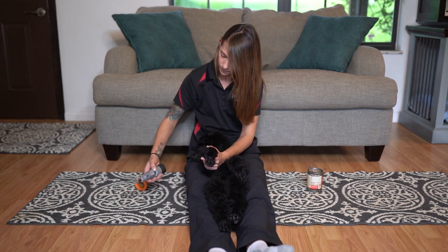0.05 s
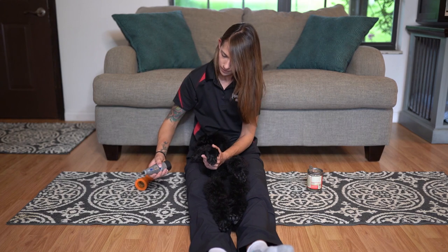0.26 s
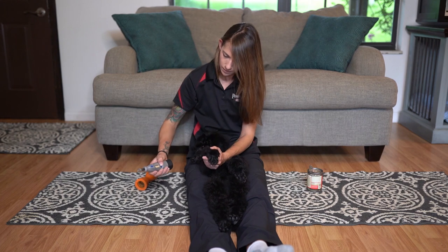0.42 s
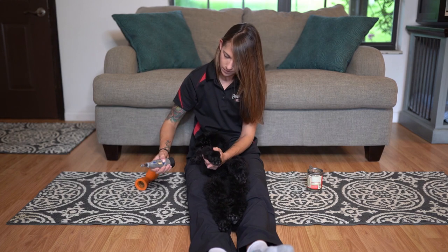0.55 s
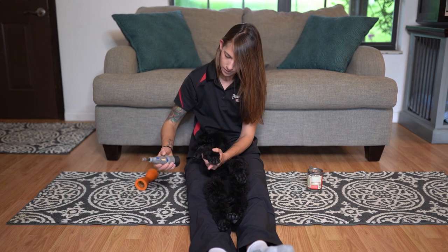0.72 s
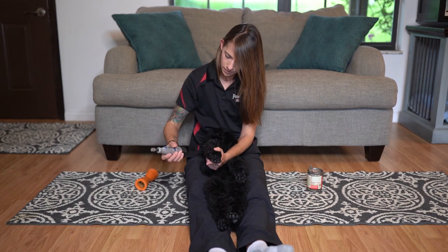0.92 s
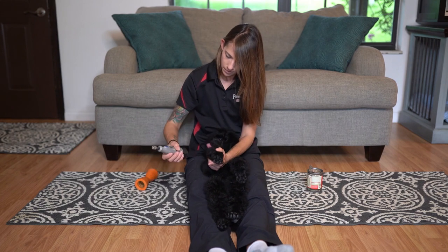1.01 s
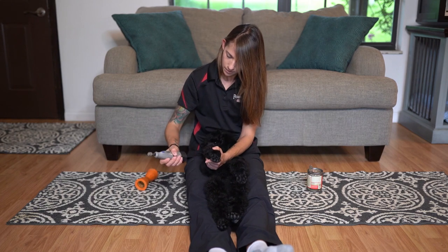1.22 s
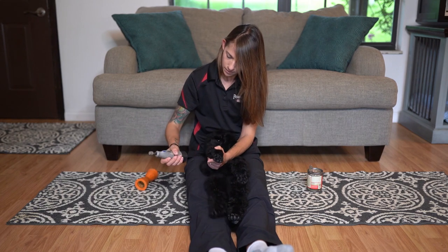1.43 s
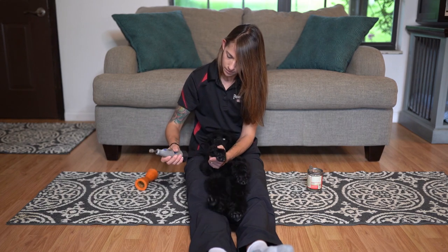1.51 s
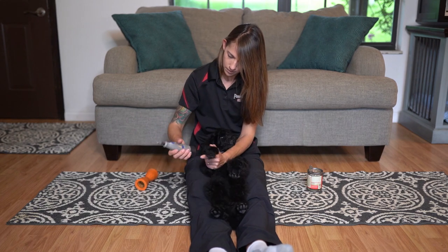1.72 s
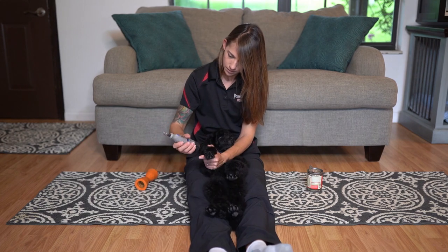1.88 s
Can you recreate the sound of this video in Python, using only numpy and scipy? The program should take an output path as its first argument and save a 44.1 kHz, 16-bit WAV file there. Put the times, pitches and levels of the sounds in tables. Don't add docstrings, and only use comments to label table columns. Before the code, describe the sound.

Handheld cordless grinder buzzes in two short whining bursts indoors, preceded by clicks and a hard snap

```python
import sys
import numpy as np
from scipy import signal
from scipy.fft import rfft, irfft
from scipy.io import wavfile
from scipy.ndimage import uniform_filter1d, map_coordinates

SR = 44100
rng = np.random.default_rng(int(sys.argv[2]) if len(sys.argv) > 2 else 0)


def voltage_ratio(level):
    return 10 ** (np.asarray(level, float) / 20)


def inscribe(sig):
    pcm = np.round(np.clip(np.atleast_2d(sig).T, -1, 1) * 32767)
    wavfile.write(sys.argv[1], SR, pcm.astype(np.int16))


N = 85995
OFF_DB = -100


def level(x, db):
    return x * voltage_ratio(db) / np.sqrt(np.mean(x ** 2))


def unit(x):
    return x / np.abs(x).max()


def band(x, hz, width, order=1):
    edges = [max(hz - width / 2, 20), min(hz + width / 2, .48 * SR)]
    return signal.sosfilt(signal.butter(order, edges, "band", fs=SR, output="sos"), x)


def colour(x, table):
    hz = np.arange(N // 2 + 1) * SR / N + 1
    points = np.array(table)
    gain_db = np.interp(np.log(hz), np.log(points[:, 0]), points[:, 1])
    return irfft(rfft(x) * voltage_ratio(gain_db), N)


def walk(rate):
    hold = int(SR / rate)
    steps = np.repeat(rng.standard_normal(N // hold + 1), hold)
    return 1.3 * uniform_filter1d(uniform_filter1d(steps, hold), hold)[:N]


def spiky_noise(spread_db):
    return rng.standard_normal(N) * voltage_ratio(spread_db * rng.exponential(size=N))


def curve(tables, col, off):
    t = np.arange(N) / SR
    out = np.full(N, float(off))
    for rows in map(np.array, tables):
        inside = (t >= rows[0, 0]) & (t <= rows[-1, 0])
        out[inside] = np.interp(t, rows[:, 0], rows[:, col])[inside]
    return uniform_filter1d(out, 300)


# time in seconds, pitch in Hz, level in dB.
WHINE = [
    [(.47, 1130, -53), (.5, 1194, -56), (.53, 1268, -39), (.553, 1291, -53.5), (.565, 1296, -56),
     (.582, 1303, -45.5), (.615, 1263, -55), (.64, 1094, -64.5), (.67, 982, -61)],
    [(1.235, 930, -80), (1.265, 1040, -58), (1.31, 1269, -52.5), (1.39, 1435, -42), (1.435, 1480, -53),
     (1.457, 1472, -60), (1.485, 1450, -41.5), (1.53, 1323, -45.5), (1.575, 1078, -59)],
]
# order in cycles per turn, level in dB relative to the whine.
ORDERS_DB = [(9, -23), (11, -18.5), (12, -24), (17, -17.5)]
# time in seconds, fan hiss level in dB, shell rattle and grip drone in dB over the hiss.
RUN = [
    [(.44, -41, -2.5, -12), (.47, -50.5, 1, 1), (.53, -49.5, -7, -5), (.62, -52.5, -1.5, -17),
     (.675, -51.5, 6.5, -1), (.79, -58, -0.5, -10.5), (.835, -62, -4, -15), (.87, -74, -11, 6),
     (.92, -88, -2, 0)],
    [(1.21, -77, 9, 3), (1.25, -53, -5.5, -1), (1.31, -47, -1.5, -1), (1.46, -48, 1, -20),
     (1.5, -45, 3, -8), (1.58, -47, 3, 1.5), (1.65, -52, -1.5, 1), (1.78, -62.5, -1, -7),
     (1.93, -79, 7.5, -3)],
]
# centre in Hz, width in Hz, level in dB.
SHELL = [(1750, 460, 8.5), (2125, 700, 10), (2500, 230, -2.5), (2850, 480, -10.5)]
# centre in Hz, width in Hz, level in dB.
GRIP = [(1080, 310, -16.5), (1200, 170, -3.5), (1396, 370, 7), (1605, 130, -0.5)]
# frequency in Hz, density in dB per Hz.
FAN = [(1880, -19), (3200, -5), (3770, -4), (4270, -0.5), (7440, -1), (11500, -3), (15800, -12.5),
       (16200, -42), (16500, -48)]


def motor():
    whine_order = 10
    rows = np.vstack(WHINE)
    hz = np.interp(np.arange(N) / SR, rows[:, 0], rows[:, 1]) * (1 + .006 * walk(60.02))
    turn = np.cumsum(hz / whine_order) / SR

    def tone(order):
        return np.sqrt(2) * np.sin(2 * np.pi * (order * turn + rng.random()))

    whine = voltage_ratio(0.5 * walk(36)) * tone(whine_order)
    for order, db in ORDERS_DB:
        whine = whine + voltage_ratio(db + 9.27 * walk(70)) * tone(round(order))

    gate = 0.5 + .8 * np.exp(-(turn % 1) / 0.51)
    grit = spiky_noise(2.73) * gate
    shell = sum(voltage_ratio(db) * band(grit, f, w) for f, w, db in SHELL)
    shell = level(shell, 0.4) * voltage_ratio(1.2 * walk(29.3))
    grip = sum(voltage_ratio(db) * band(grit, f, w, order=2) for f, w, db in GRIP)
    grip = level(grip, 0) * voltage_ratio(2.5 * walk(39.5))

    fan = level(colour(spiky_noise(1.9) * gate, [(1500, -49)] + FAN), 0)
    fan = fan + .5 * band(fan, 11740, 610) + .5 * band(fan, 4290, 270) + 0.22 * band(fan, 6300, 400)

    whine_gain = voltage_ratio(curve(WHINE, 2, OFF_DB) - 2.0)
    run_gain = voltage_ratio(curve(RUN, 1, OFF_DB) - 3.5)
    body = fan + voltage_ratio(curve(RUN, 2, 0)) * shell + voltage_ratio(curve(RUN, 3, 0)) * grip
    return whine_gain * whine + run_gain * body


# start in seconds, peak in dB, ring in Hz, dull share from 0 to 1.
CLICKS = [(0.1368, -40.5, 2630, 0.26), (0.159, -60, 9800, .1), (0.1721, -39.5, 3140, 0.56),
          (0.2293, -45.5, 5560, 0), (0.2422, -25, 6820, 0.23), (0.279, -52, 7100, 0.6),
          (0.284, -52, 8260, 0), (0.3046, -64, 8650, 0.3), (0.3393, -45, 1920, 0.76),
          (0.3807, -40.5, 2040, 0.34), (0.4044, -40.5, 1750, 0.86), (0.426, -22.5, 8430, 0.72),
          (0.4454, -41, 7900, 0.9), (0.4678, -33, 7660, 0.35), (0.472, -46, 4670, .1)]


def clicks():
    length = 900
    out, t = np.zeros(N), np.arange(length) / SR

    def ring(hz, fade_s):
        return np.sin(2 * np.pi * hz * t) * np.clip(t / 0.00038, 0, 1) * np.exp(-t / fade_s)

    for s, db, hz, dull in CLICKS:
        push = rng.standard_normal(length) * t * np.exp(-t / .0007)
        dull = np.clip(dull, 0, 1)
        crack = unit(band(push, 7970, 6530, order=2))
        crack = crack + .45 * unit(band(push, 4130, 1860, order=2)) + .4 * unit(band(push, 13400, 5100))
        knock = ring(2254, 0.00083) + 0.29 * ring(1752, 0.0025) + .16 * ring(1181, 0.003)
        click = (1 - dull) * crack + 0.71 * ring(hz, .0007) + dull * knock
        i = int(s * SR)
        out[i:i + length] += voltage_ratio(db) * unit(click)
    return out


def snap():
    t = np.clip(np.arange(N) / SR - .4326, 0, 1)
    push = rng.standard_normal(N) * t * np.exp(-t / 0.00075)
    return voltage_ratio(-22) * unit(band(push, 9500, 9400, order=2))


# centre in seconds, length in seconds, level in dB.
RUSTLE = [
    (0.194, 0.036, -62),
    (0.33, 0.053, -73),
    (0.417, 0.023, -67),
    (1.046, 0.028, -68.5),
]


def rustle():
    t = np.arange(N) / SR
    swell = sum(voltage_ratio(db) * np.exp(-((t - s) / length) ** 2) for s, length, db in RUSTLE)
    grains = spiky_noise(3.6)
    rub = level(band(grains, 2300, 1470) + 0.21 * band(grains, 5500, 4900), 0)
    return swell * voltage_ratio(1.2 * walk(50)) * rub


FLOOR_S = .0066


def floor_echo(x):
    late = np.r_[np.zeros(round(FLOOR_S * SR)), x][:N]
    return late - .6 * band(late, 2400, 1100) + 1.28 * band(late, 1180, 460)


def tail(db):
    t = np.arange(SR // 2) / SR

    def fade(t60_s):
        return np.exp(-np.log(1000) * t / t60_s) * np.clip(t / 0.0059, 0, 1)

    noise = rng.standard_normal((2, len(t)))
    low = band(noise, 2140, 4500)
    out = low * fade(0.62) + (noise - low) * fade(.4)
    return out * voltage_ratio(db) / np.sqrt((out ** 2).sum(axis=1, keepdims=True))


# frequency in Hz, density in dB per Hz.
ROOM = [(120, -29), (200, -6), (1000, -5.5), (1100, -6.5), (1230, -5), (1530, -7), (1740, -8.5),
        (4430, -13), (16000, -18.5)]


def room_tone():
    mid, side = rng.standard_normal((2, N))
    shape = [(25, -34), (60, -22.5), (125, -20.5), (190, -19.5), (300, -8.5), (450, -3.5)] + ROOM[1:]
    side_db = [(30, -5), (165, -10.5), (250, -11), (600, -3.5), (3000, 1.5), (14000, -1.0)]
    sign = np.array([[1], [-1]])
    air = colour(mid, shape) + sign * colour(colour(side, shape), side_db)
    hum = band(rng.standard_normal(N), 163, 17, order=2)
    return level(air, -61.5) + level(hum, -90)


# delay in seconds, level in dB.
ECHOES = [
    (.0132, -11),
    (.0205, -9),
    (.0345, -13),
    (.0435, -13),
    (.048, -13),
]


def scene():
    sway_s, sway_per_s, pan_db = 0.000393, 7, 2.1

    def thin(x):
        return signal.sosfilt(signal.butter(4, 800, "high", fs=SR, output="sos"), x)

    def through(x, response):
        return signal.fftconvolve(x[None], response, axes=1)[:, :N]

    low_down, held = thin(clicks() + rustle()), thin(motor())
    response = tail(0.5)
    response[:, 0] = 1
    wet = through(snap(), response)
    for k, (s, db) in enumerate(ECHOES):
        response[[0, 1], int(s * SR) + np.array([0, 3 * k + 2])] += voltage_ratio(db)
    wet = wet + through(low_down + floor_echo(low_down), response)

    sway = np.array([walk(sway_per_s), walk(sway_per_s)])
    late = np.arange(N) - SR * (FLOOR_S + sway_s * sway)
    wet = wet + held + voltage_ratio(-10) * map_coordinates(held, [late], mode="nearest")
    places = np.array([walk(sway_per_s) for _ in range(6)])
    places = places / np.sqrt((places ** 2).sum(axis=0))
    wet = wet + sum(through(held * place, tail(-4.5)) for place in places)
    pan = voltage_ratio(np.array([[pan_db], [-pan_db]]) / 2)
    return wet * pan + room_tone()


def band_limit(x):
    return signal.sosfilt(signal.butter(12, 16820, fs=SR, output="sos"), x)


def record(dry):
    mix = signal.sosfilt(signal.ellip(8, .2, 45, 16150, fs=SR, output="sos"), dry)
    return band_limit(mix)


dry = scene()
out = record(dry)
inscribe(out)
```